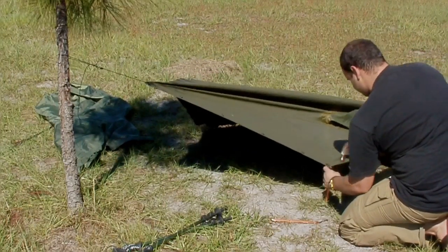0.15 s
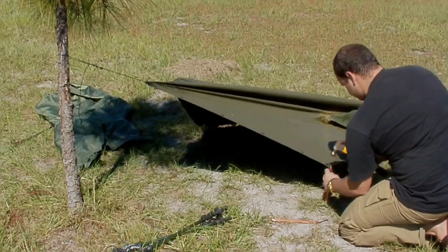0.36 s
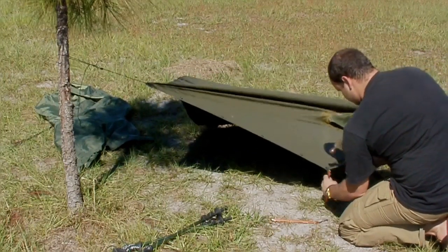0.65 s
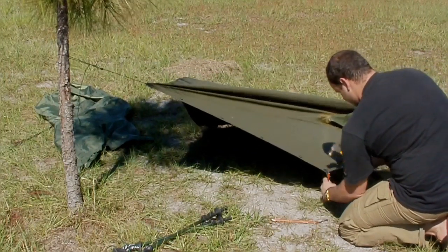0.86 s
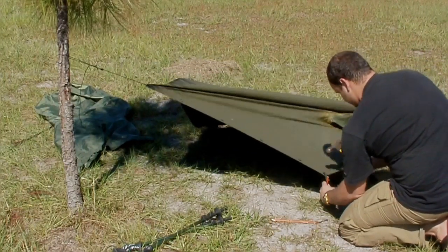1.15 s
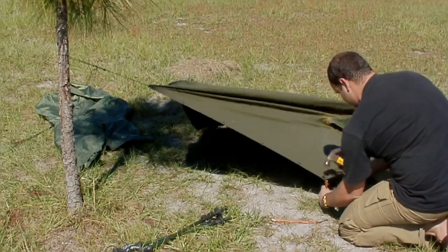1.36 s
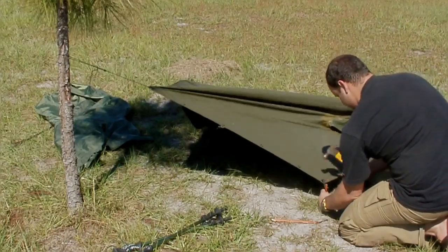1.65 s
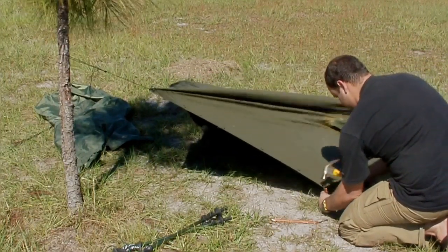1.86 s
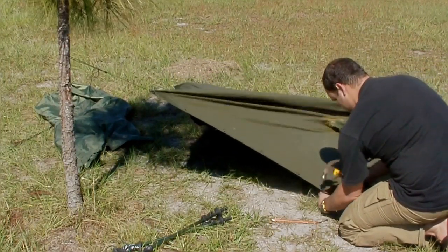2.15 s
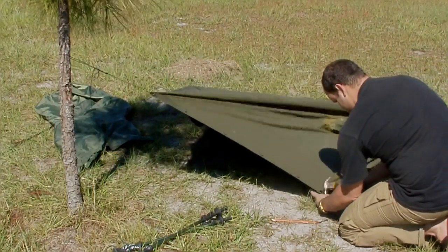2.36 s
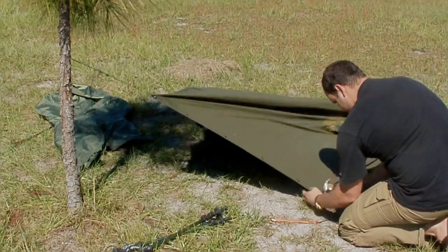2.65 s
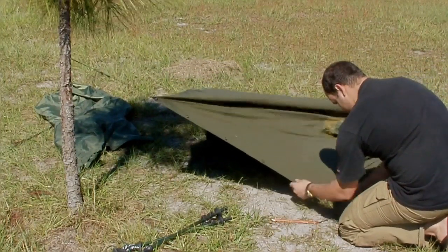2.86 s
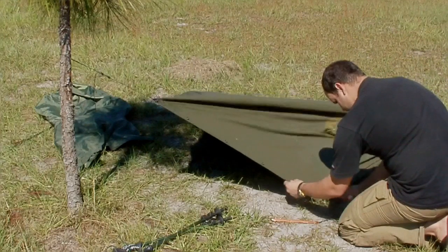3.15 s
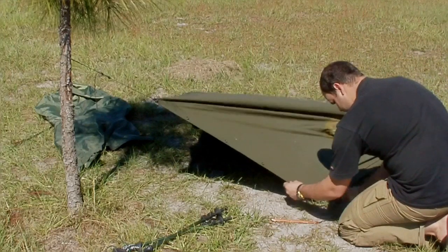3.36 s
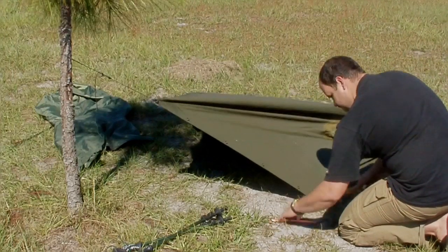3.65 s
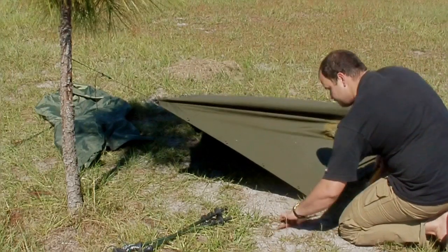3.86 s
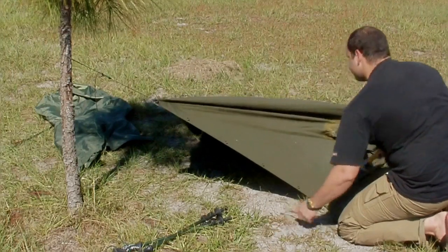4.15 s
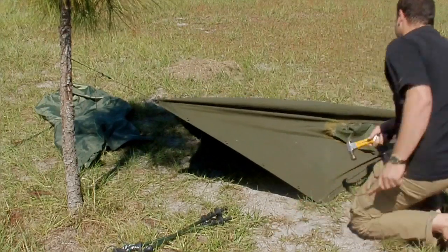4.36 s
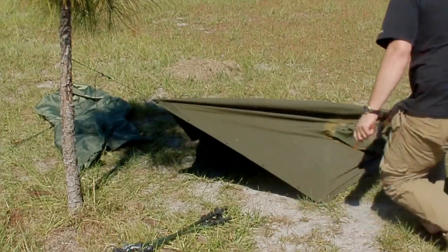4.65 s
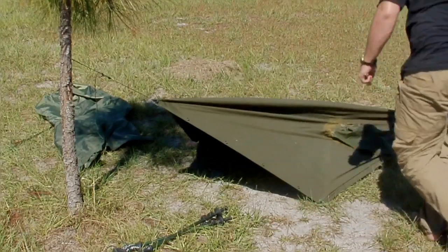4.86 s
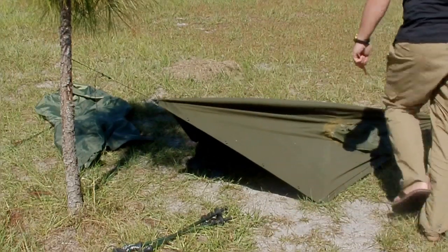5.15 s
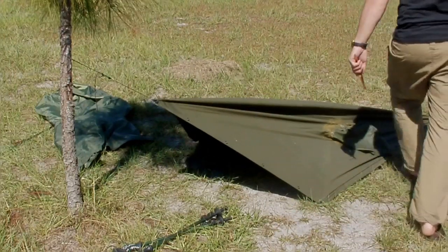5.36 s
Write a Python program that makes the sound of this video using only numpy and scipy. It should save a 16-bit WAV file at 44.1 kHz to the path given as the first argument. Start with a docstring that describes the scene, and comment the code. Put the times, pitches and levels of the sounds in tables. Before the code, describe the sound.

In an open grassy field, a steel hammer strikes a tent stake twelve times, about four blows a second, very loud and overloaded close to the microphone. Each clank is short and chattering, with a rebound and gritty crunch, growing lower toward the end. Afterwards, grass brushes softly under steps and trouser cloth zips briefly. Faint hiss, insects, distant birds and low wind puffs surround it.

```python
"""A steel hammer drives a tent stake into sandy ground with twelve quick blows, so loud that their peaks are
clipped flat. Each blow is a cracking, chattering clank of decaying tones, lower as the stake sinks, with a
rebound, a thud, a gritty crunch and a head ping. Grains of noise are grass, ticking softly throughout and
swishing under steps; a rising noise band is trouser cloth. Around it lies an open field: soft hiss, insect
tones, far whistling birds and low puffs of breeze on the microphone."""
import sys
import numpy as np
from scipy import signal
from scipy.fft import rfft, irfft
from scipy.io import wavfile

SR = 44100
rng = np.random.default_rng(int(sys.argv[2]) if len(sys.argv) > 2 else 0)


def generate_wav(signal):
    """Clip the signal to [-1, 1] and save it as 16-bit WAV at the path in sys.argv[1]."""
    frames = np.transpose(np.atleast_2d(signal))
    scaled = np.clip(frames, -1, 1) * 32767
    pcm = np.round(scaled).astype(np.int16)
    wavfile.write(sys.argv[1], SR, pcm)


N = 243022

# Hammer blows. Each row: start in seconds, force in dB, lower and upper bending tone of the stake in Hz,
# upper tone's share of their energy (0-1), head ping in dB, ground thud in dB, rebound delay in seconds,
# rebound level in dB re the blow.
BLOWS = [ (.7800, 4.5, 4827, 5530, 0.48, -21, -21, 0.0046, -10),
         (1.0531, 2.5, 4870, 7200, 0, -31, -19, .004, -18),
         (1.3156, 8.5, 3679, 5323, 0.36, -14.5, -10, 0.0084, -19),
         (1.5771, 7.5, 3670, 4760, .35, -19.5, -14, .005, -2),
         (1.8363, 5, 3280, 6873, 0.91, -4.5, -17, 0.0042, -9.5),
         (2.1068, 5, 3850, 5450, 0.37, -10.5, -13.5, .0099, -14),
         (2.3809, 7, 3366, 7614, 0.33, -14.5, -23.5, 0.0041, -5),
         (2.6531, 6, 2114, 5840, 0.6, -20.5, -25, 0.0041, -6),
         (2.9180, 0, 3170, 5600, 0, -26, -22, .006, -2.5),
         (3.1747, 2.2, 2710, 3650, 0.53, -18.5, -19.5, 0.0026, -8),
         (3.4432, 3, 3204, 5880, 0.63, -21, -11, .004, -18),
         (3.7196, -1.5, 1890, 4380, .58, -15.5, -18.5, .0035, -15)]
# Strength of the breeze, for rumble and small eddies. Each row: time in seconds, level in dB.
BREEZE_STRENGTH = [(0, -74), (.35, -61.5), (1.2, -62), (2.2, -57.5), (2.6, -65), (3.3, -63.5), (4.2, -68.5),
                   (5.5, -87)]


def amp(db):
    """Decibels to gain."""
    return 10 ** (np.asarray(db) / 20)


def evened(x):
    """Scales to rms 1."""
    return x / np.sqrt(np.mean(x ** 2) + 1e-20)


def read(points, hz):
    """Interpolates a table on a log-frequency axis."""
    f, value = np.transpose(points)
    return np.interp(np.log(hz + 1), np.log(f + 1), value)


def add(mix, start_s, sound):
    """Mixes a sound in at start_s; an earlier start than 0 becomes 0."""
    part = mix[max(round(start_s * SR), 0):][:len(sound)]
    part += sound[:len(part)]


def coloured(x, spectrum):
    """Filters x by the spectrum, at rms 1."""
    gain = amp(read(spectrum, np.fft.rfftfreq(len(x), 1 / SR)))
    return evened(irfft(rfft(x) * gain, len(x)))


def noise(spectrum, size):
    """Random noise with the spectrum, rms 1."""
    return coloured(rng.standard_normal(size), spectrum)


def drift(cutoff_hz, size):
    """Random wander below about cutoff_hz, rms 1."""
    lowpass = np.exp(-(np.fft.rfftfreq(size, 1 / SR) / cutoff_hz) ** 2)
    return evened(irfft(rfft(rng.standard_normal(size)) * lowpass, size))


def fade(t, t60_s):
    """Exponential decay by 60 dB in t60_s."""
    return np.exp(-np.log(1000) * t / t60_s)


def ring(t, hz):
    """A sine of rms 1 and random phase."""
    return np.sqrt(2) * np.sin(2 * np.pi * (hz * t + rng.random()))


def sweep(hz):
    """A sine of rms 1 that follows a pitch curve."""
    return np.sqrt(2) * np.sin(2 * np.pi * np.cumsum(hz) / SR)


def rough_tone(hz, width_hz, size):
    """A resonance shaken at random: a narrow band of noise around hz."""
    phase = 2 * np.pi * np.cumsum(hz * np.ones(size)) / SR
    return drift(width_hz, size) * np.cos(phase) + drift(width_hz, size) * np.sin(phase)


def grainy(spectrum, size, grain_db, rate_hz):
    """Noise in tiny bursts of very unequal size, rms 1."""
    grain = amp(grain_db * np.clip(drift(rate_hz, size), -2, 2))
    return coloured(rng.standard_normal(size) * grain, spectrum)


def field(level_db=-42.5, swell_db=.5, insect_waver_hz=5):
    """Nearly even outdoor hiss, alike in both channels except in the treble, with thin wavering insect tones."""
    # Hiss colour. Each row: frequency in Hz, relative density in dB per Hz.
    hiss_colour = [(15, -57), (25, -19), (79, -17), (227, -19), (260, -18), (359, -10), (389, -11),
                   (421, -12.5), (919, -4), (5280, -11.5), (13500, -14.5), (15500, -19)]
    # Each row: frequency in Hz, left-right likeness (0-1).
    likeness = [(60, 0.96), (180, 0.87), (550, 0.99), (1650, 0.89), (4970, 0.27), (15000, 0.054)]
    # Each row: insect pitch in Hz, level in dB.
    insect_tones = [(3297, -61), (7885, -64)]
    mid, side = (rfft(noise(hiss_colour, N)) for _ in range(2))
    same = np.clip(read(likeness, np.fft.rfftfreq(N, 1 / SR)), 0, 1)
    side = np.outer([1, -1], side * np.sqrt((1 - same) / 2))
    air = irfft(mid * np.sqrt((1 + same) / 2) + side, N)
    insects = sum(amp(db) * sweep(hz + insect_waver_hz * drift(36, N)) for hz, db in insect_tones)
    return amp(level_db + swell_db * drift(1.2, N)) * air + insects


def eddies(count=80, rate_per_s=11, over_db=17.5, spread_db=2.5, median_hz=145, spread_octaves=0.34):
    """Small eddies at uneven intervals, their levels following the breeze: rows (s, dB, pitch Hz)."""
    s = (np.arange(count) + rng.random(count)) / rate_per_s
    strength, pitch = rng.standard_normal((count, 2)).T
    db = np.interp(s, *np.transpose(BREEZE_STRENGTH)) + over_db + spread_db * strength
    return list(zip(s, db, median_hz * 2 ** (spread_octaves * pitch)))


def breeze(cycles=0.59, flutter_db=-18, flutter_s=0.016, lumps_db=3):
    """Each eddy gives the diaphragm a push of a cycle or two, over a lumpy low rumble."""
    # Strongest puffs. Each row: centre in seconds, level in dB, pitch in Hz.
    strong_puffs = [(.484, -37.5, 141), (.797, -23, 218), (.821, -26, 247), (.855, -29.5, 190),
                    (.884, -32, 216), (1.43, -33.5, 149), (1.46, -17, 363), (1.732, -30.5, 300),
                    (2.035, -34.5, 212), (2.152, -28, 182), (2.757, -35.5, 170), (3.164, -32, 119),
                    (3.229, -24, 162)]
    colour = [(25, -5), (120, -3.0), (300, -6.5), (700, -15), (3000, -60)]  # (Hz, relative dB per Hz)
    rumble_db = np.interp(np.arange(N) / SR, *np.transpose(BREEZE_STRENGTH)) + lumps_db * drift(25, N)
    out = noise(colour, N) * amp(rumble_db)
    t = np.arange(-2048, 2048) / SR
    for s, db, hz in strong_puffs + eddies():
        push = ring(t, hz) / np.sqrt(2) * np.exp(-(t * hz / cycles) ** 2)
        flutter = noise(colour, len(t)) * np.exp(-(t / flutter_s) ** 2)
        add(out, s + t[0], amp(db) * (push + amp(flutter_db) * flutter))
    return out


def steps(grain_db=5, stir_db=-57, stir_grain_db=8):
    """Grass blades tick against hands and feet; the soft ticks grow as the camper gets up and walks."""
    # Brushing strokes. Each row: peak time in seconds, width in seconds, level in dB.
    strokes = [(1.675, 0.014, -42.5), (2.215, 0.014, -42), (4.465, .01, -47.5), (4.662, .009, -42),
               (4.70, 0.029, -39.5), (5.239, 0.017, -36.5), (5.47, 0.088, -41.5)]
    # Each row: frequency in Hz, relative density in dB per Hz.
    grass_colour = [(100, -25), (400, -7.5), (800, -0.5), (2200, 3.5), (4000, -2), (7000, -9), (16000, -20)]
    t = np.arange(N) / SR
    stroke = sum(amp(db) * np.exp(-.5 * ((t - s) / width_s) ** 2) for s, width_s, db in strokes)
    stirring = amp(stir_db) * np.interp(t, [3.7, 4.0], [.4, 1])
    brushing = stroke * grainy(grass_colour, N, grain_db, rate_hz=720)
    return brushing + stirring * grainy(grass_colour, N, stir_grain_db, rate_hz=340)


def clank(t, t60_s, centre_hz, bending, detune=0.01914, octaves=1.155, width_hz=260,
          modes_db=-3, crack_db=-5, bend_db=-1, crack_t60_s=0.027):
    """One contact of steel on stake: a crack and chattering modes that the soil damps within milliseconds."""
    # Modes that every blow wakes. Each row: nominal frequency in Hz, relative level in dB.
    stake_modes = [(1400, 2.5), (1700, 3.5), (2150, -5), (2600, -0.5), (3100, -2), (3600, -3.5), (4000, -4),
                   (4450, -2), (4950, -5.5), (5400, -6.5), (5820, 1), (6750, -4), (7150, 0), (7700, 3.5),
                   (8400, -2)]
    # Each row: frequency in Hz, relative density in dB per Hz.
    crack_colour = [(20, -40), (200, -31), (900, -7), (2000, -6.5), (4000, 0.5), (7500, -3), (9500, -8.5),
                    (13000, -11), (16000, -32)]
    hz, db = np.transpose(stake_modes)
    hz = hz * (1 + detune * rng.standard_normal(len(hz)))  # the soil grips differently each time
    weight = amp(db) * np.exp(-(np.log2(hz / centre_hz) / octaves) ** 2)
    weight = weight / np.linalg.norm(weight)
    modes = sum(w * ring(t, f) for f, w in zip(hz, weight))
    decay, bends = fade(t, t60_s), 0
    for tone_hz, share in bending:
        tone = rough_tone(tone_hz, width_hz, len(t))  # chatter against the sand broadens each tone
        level = np.sqrt(share) * np.linalg.norm(decay) / np.linalg.norm(tone * decay)
        bends = bends + level * tone
    crack = noise(crack_colour, len(t)) * fade(t, crack_t60_s)
    return (amp(modes_db) * modes + amp(bend_db) * bends) * decay + amp(crack_db) * crack


def hammering(thud_t60_s=0.025, crunch_t60_s=0.19, crunch_rise_s=0.00082, rebound_t60_s=0.027, sand_grain_db=4.0):
    """Each blow clanks twice as the hammer rebounds, and shoves the stake deeper into gritty sand."""
    # Colours of thud and crunch. Each row: frequency in Hz, relative density in dB per Hz.
    thud_colour = [(20, -17), (70, -8.5), (180, 0.5), (400, -4), (900, -3), (2000, -18), (6000, -50)]
    crunch_colour = [(30, -41), (150, -5), (400, 0), (1000, 0), (2300, -1), (4500, -9.5), (8000, -14.5),
                     (16000, -21)]
    shallow_hz, deep_hz, dulling_power = 5400, 1700, 3.8  # clank centre drops late, as the head nears the ground
    shallow_t60_s, deep_t60_s = 0.024, 0.017  # the soil damps the stake more and more
    loose_crunch_db, firm_crunch_db, firm_depth = -39, -26.5, 0.36  # grows until the tip reaches firm sand
    crunch_db_per_force_db = 0.22  # harder blows crush a little more sand
    out, t = np.zeros(N), np.arange(SR // 4) / SR
    depths = np.linspace(0, 1, len(BLOWS))  # steady sinking, first blow 0, last blow 1
    for depth, blow in zip(depths, BLOWS):
        s, force_db, low_hz, high_hz, share, _, thud_db, lag_s, rebound_db = blow
        centre_hz = shallow_hz + (deep_hz - shallow_hz) * depth ** dulling_power
        t60_s = shallow_t60_s + (deep_t60_s - shallow_t60_s) * depth
        crunch_db = np.interp(depth, [0, firm_depth], [loose_crunch_db, firm_crunch_db])
        crunch_db = crunch_db + crunch_db_per_force_db * force_db
        share = np.clip(share, .001, .999)
        bending = [(low_hz, 1 - share), (high_hz, share)]
        add(out, s, amp(force_db) * clank(t, t60_s, centre_hz, bending))
        rebound = clank(t, t60_s, centre_hz, bending) * fade(t, rebound_t60_s)
        add(out, s + lag_s, amp(force_db + rebound_db) * rebound)
        add(out, s, amp(thud_db) * noise(thud_colour, len(t)) * fade(t, thud_t60_s))
        sand = grainy(crunch_colour, len(t), sand_grain_db, rate_hz=290)
        add(out, s, amp(crunch_db) * sand * fade(t, crunch_t60_s) * (1 - np.exp(-t / crunch_rise_s)))
    return out


def outdoors(x, scatter_db=-31, t60_s=0.3, side_db=-19):
    """Grass and trees return a thin tail and two weak, smeared echoes."""
    # Colour of the scattered sound. Each row: frequency in Hz, relative level in dB.
    scatter_colour = [(50, 12), (800, -26), (2200, -12), (4500, -12.5), (8000, -12.5), (16000, -8.5)]
    # Echoes from the trees. Each row: delay in seconds, width in seconds, level in dB.
    tree_echoes = [(0.0403, 0.0016, -40), (0.102, 0.0047, -42.5)]
    t = np.arange(SR // 2) / SR
    shapes = [(fade(t, t60_s), scatter_db)]
    shapes += [(np.exp(-((t - delay_s) / width_s) ** 2), db) for delay_s, width_s, db in tree_echoes]
    envelope = np.sqrt(sum((amp(db) * shape / np.linalg.norm(shape)) ** 2 for shape, db in shapes))
    mid = noise(scatter_colour, len(t))
    side = np.outer([1, -1], amp(side_db) * noise(scatter_colour, len(t)))
    return x + signal.fftconvolve(x[None], envelope * (mid + side), axes=1)[:, :N]


def pings():
    """The free steel head rings on after the damped stake has stopped."""
    # Modes of the head. Each row: frequency in Hz, level in dB re the ping, t60 in seconds.
    head_modes = [(6224, 0, .075), (10120, -19, .085), (14340, -27, .05)]
    out, t = np.zeros(N), np.arange(SR // 4) / SR
    for s, _, _, _, _, ping_db, *_ in BLOWS:
        ping = sum(amp(db) * ring(t, hz) * fade(t, t60_s) for hz, db, t60_s in head_modes)
        add(out, s, amp(ping_db) * ping)
    return out


def birds(waver=0.0083):
    """Three far birds, each repeating or singing once its own curved, slightly unsteady whistle."""
    # Whistles, each: length in seconds, then start, middle and end pitch in Hz.
    low_arch, long_fall, high_dip = (0.089, 1255, 1420, 1275), (.36, 3600, 3420, 3080), (.04, 7900, 6900, 8150)
    # Calls of each bird. Each row: start in seconds, level in dB.
    low_calls, long_calls, high_calls = [(2.833, -48.5), (3.474, -48.5), (4.165, -49.5), (5.315, -50)], [(2.508, -54), (3.318, -52.5)], [(3.81, -50)]
    out = np.zeros(N)
    for whistle, calls in [(low_arch, low_calls), (long_fall, long_calls), (high_dip, high_calls)]:
        length_s, *pitch_hz = whistle
        u = np.linspace(0, 1, round(length_s * SR))
        curve_hz = np.polyval(np.polyfit([0, .5, 1], pitch_hz, 2), u)
        for s, db in calls:
            hz = curve_hz * (1 + waver * drift(150, len(u)))
            add(out, s, amp(db) * sweep(hz) * signal.windows.tukey(len(u), .3))
    return out


def trousers(width_hz=330):
    """Ribs of cloth rub with growing speed, so the pitch rises, and catch hardest in one short zip."""
    swish_s, swish_hz, rise_hz_per_s, swish_db = 5.36, 1780, 18700, -50
    zip_s, zip_width_s, zip_db = 5.482, .009, -34.5
    t = np.arange(N) / SR
    hz = swish_hz + rise_hz_per_s * np.maximum(t - swish_s, 0)
    zip_level = amp(zip_db) * np.exp(-.5 * ((t - zip_s) / zip_width_s) ** 2)
    return (amp(swish_db) * (t > swish_s) + zip_level) * rough_tone(hz, width_hz, N)


def scene():
    """Everything stands in front of the microphone, near the middle."""
    return field() + breeze() + steps() + outdoors(hammering()) + pings() + birds() + trousers()


def record(dry, ceiling=0.95, mismatch_db=-24, edge_hz=15900):
    """Two close capsules differ a little in the treble; peaks are clipped flat; then the band limit."""
    difference = amp(mismatch_db) * np.gradient(dry.mean(0))
    clipped = np.clip(dry + np.outer([1, -1], difference), -ceiling, ceiling)
    lowpass = signal.firwin(255, edge_hz, window=("kaiser", 8), fs=SR)
    return signal.oaconvolve(clipped, lowpass[None], "same")


dry = scene()
out = record(dry)
generate_wav(out)
```